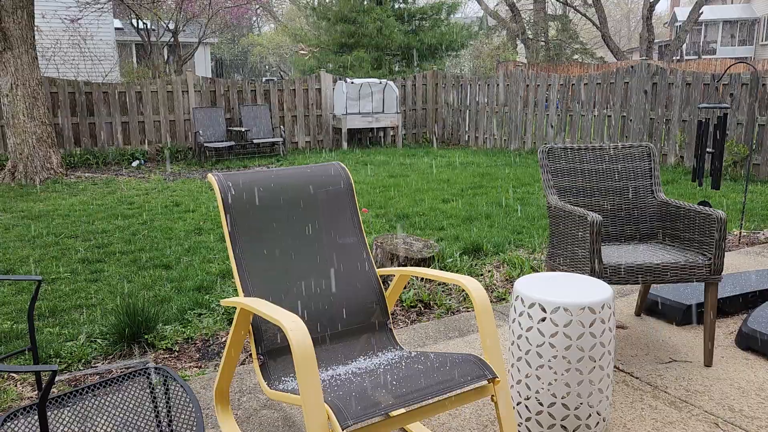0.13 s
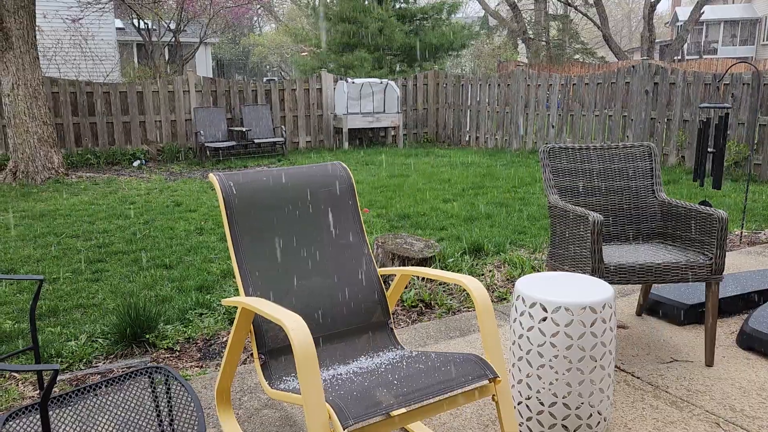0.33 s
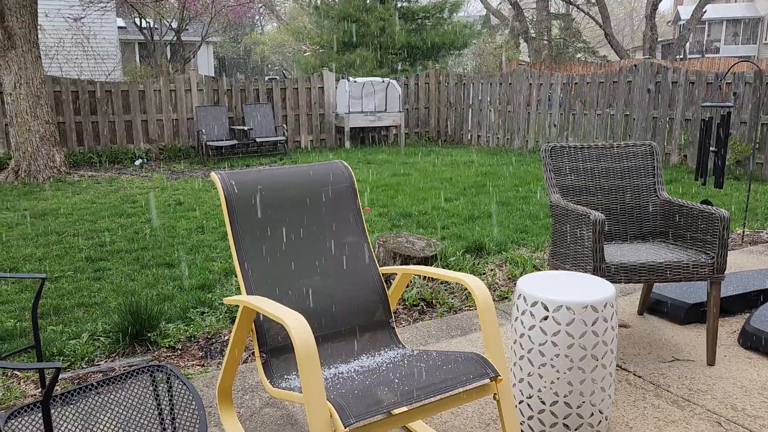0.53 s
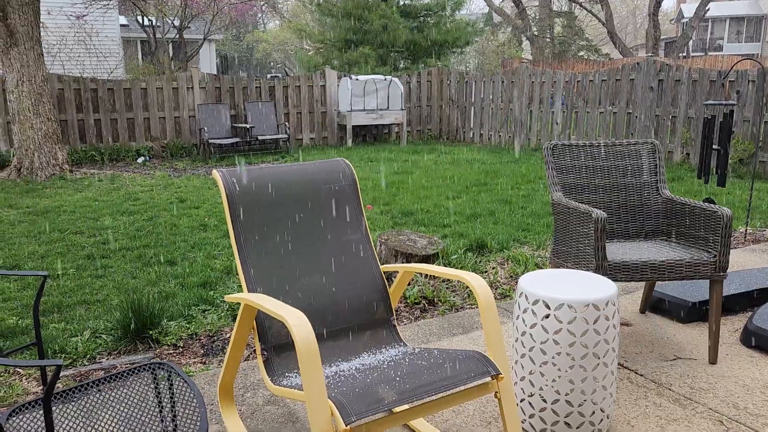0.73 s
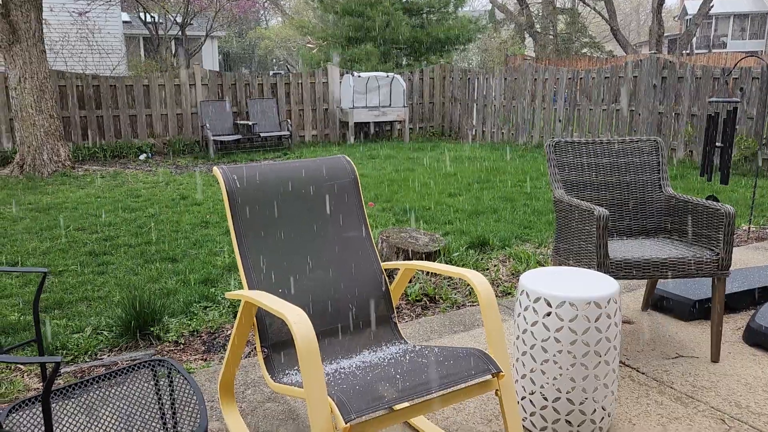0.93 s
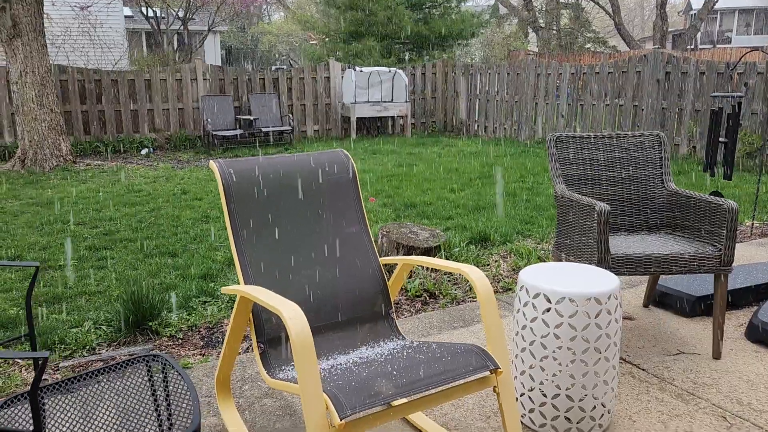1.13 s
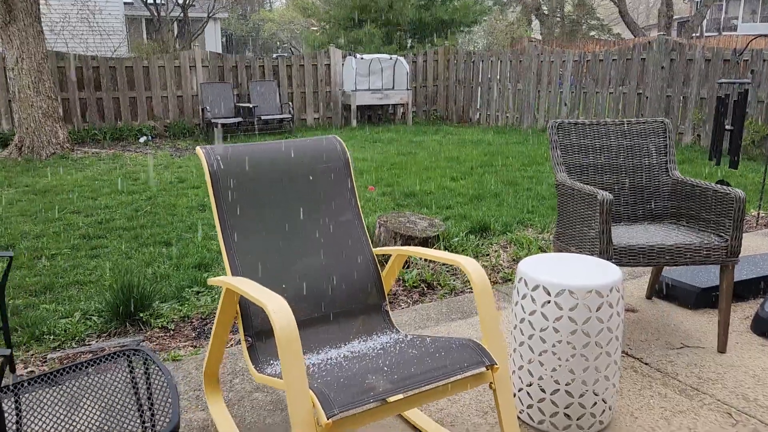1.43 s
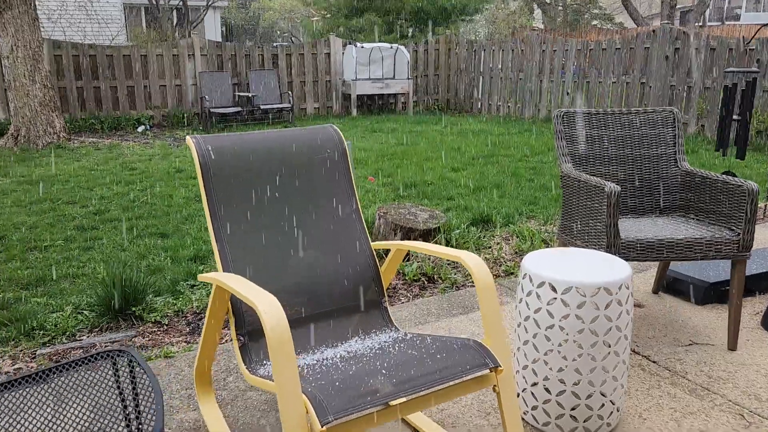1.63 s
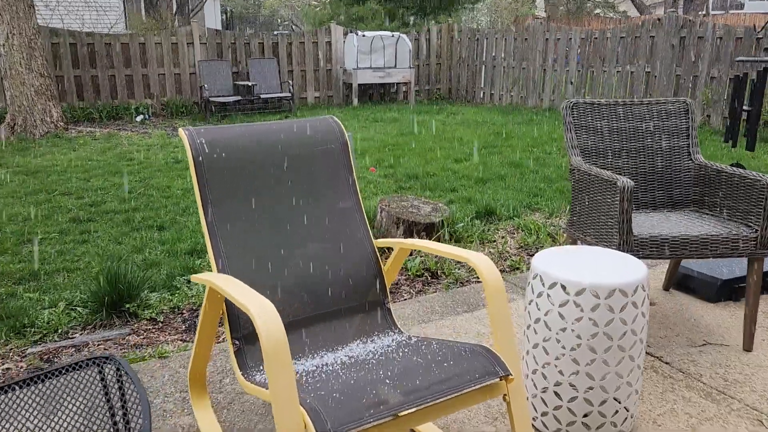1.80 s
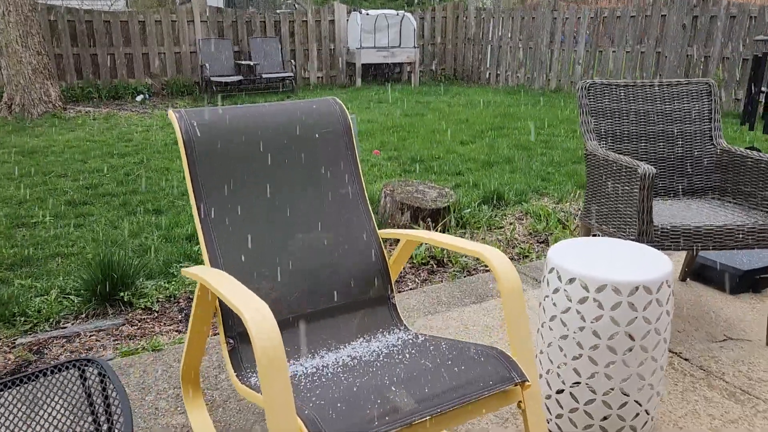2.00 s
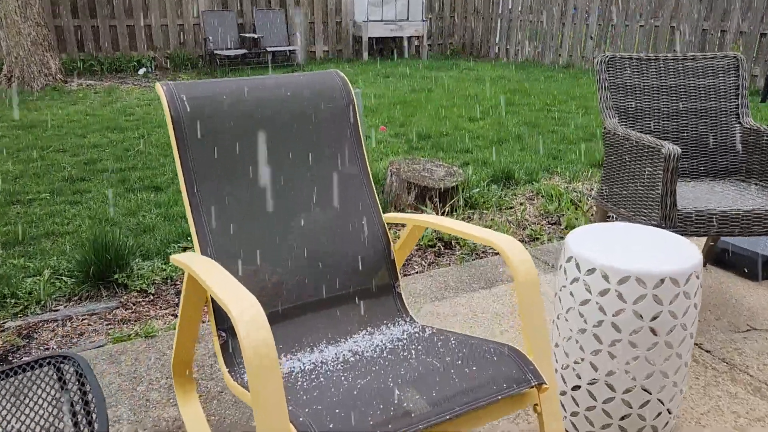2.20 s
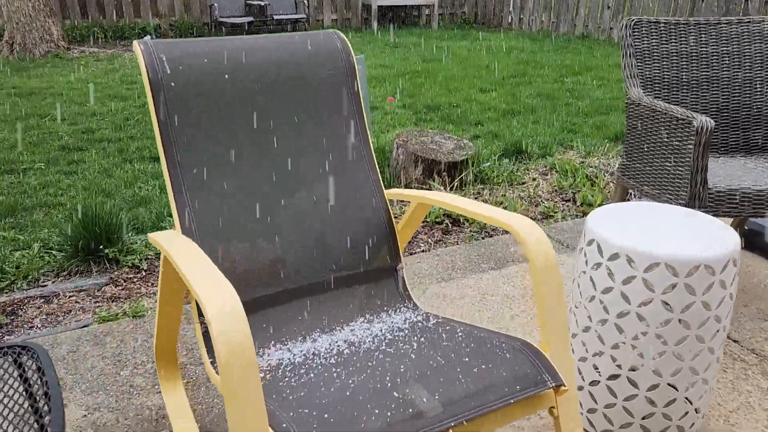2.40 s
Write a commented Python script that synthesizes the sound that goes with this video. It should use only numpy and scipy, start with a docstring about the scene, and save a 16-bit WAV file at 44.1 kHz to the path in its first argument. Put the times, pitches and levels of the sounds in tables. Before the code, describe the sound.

Ice pellets fall steadily on a patio and lawn: an even wide hiss with dense tiny ticks, over faint air rumble and distant machine hum. From 0.24 s, irregular sharp taps strike the camera, strong near 0.48, 1.34 and 1.4 s. A wind chime rings faintly at 1.36 s. Handling creaks cluster at 1.7-1.9 s and 2.43-2.53 s, with a low air puff near 2.4 s.

```python
"""Graupel on a backyard patio, heard from a hand-held camera; sound opens at 0.07 s.
Throughout: far pellets hiss (shaped noise), nearer ones tick (random hits), air rumbles, a distant machine hums.
From 0.24 s pellets strike the camera or close beside it: a shared thud plus a crack at each microphone.
At 1.36 s a wind chime rings once, faintly: one decaying sine.
From 1.68 s the case creaks in the hand (ringing slips, rubbing grains); near 2.4 s the air puffs."""
import sys
import numpy as np
from scipy import signal
from scipy.fft import rfft, irfft
from scipy.io import wavfile
from scipy.ndimage import uniform_filter1d

SR = 44100
rng = np.random.default_rng(int(sys.argv[2]) if len(sys.argv) > 2 else 0)


def unload_audio(sound):
    """Save the sound as a 16-bit wav file, at the path given as the first command line argument."""
    columns = np.transpose(np.atleast_2d(sound))
    # keep every value between -1 and 1, then stretch to whole-number steps
    steps = np.round(np.clip(columns, -1, 1) * 32767)
    wavfile.write(sys.argv[1], SR, steps.astype(np.int16))


N = 112455  # samples


def amp(db):
    """Decibels to gain."""
    return 10 ** (np.asarray(db) / 20)


def unit(x):
    """Scales to rms 1."""
    return x / np.sqrt(np.mean(x ** 2) + 1e-20)


def read(points, hz):
    """Interpolates a spectrum table on a log-frequency axis."""
    f, value = np.transpose(points)
    return np.interp(np.log(hz + 1), np.log(f + 1), value)


def add(mix, start_s, sound):
    """Mixes a stereo sound in at a time."""
    part = mix[:, max(round(start_s * SR), 0):][:, :sound.shape[1]]
    part += sound[:, :part.shape[1]]


def tint(x, colour):
    """Gives a long sound a spectrum; rms 1."""
    gain = amp(read(colour, np.fft.rfftfreq(N, 1 / SR)))
    return unit(irfft(rfft(x) * gain, N))


def causal(db):
    """Minimum-phase response with these gains: it rings only after the blow."""
    log_gain = np.log(amp(np.r_[db, db[-2:0:-1]]))
    return np.exp(np.conj(signal.hilbert(log_gain)))[:len(db)]


def flat(z, order):
    """Evens out the broad humps of a spectrum, smoothed over `order` bins."""
    power = uniform_filter1d(abs(z) ** 2, order)
    return z * causal(-10 * np.log10(power + 1e-9))


def burst(decay_s, scatter, size=1024, order=41):
    """Spectrum of a sharp contact (unit impulse) and its brief noisy rattle."""
    t = np.arange(size) / SR
    rattle = rng.standard_normal(size) * t * np.exp(-t / decay_s)
    contact = t == 0
    return flat(rfft(scatter * rattle / np.linalg.norm(rattle) + contact), order)


def spot(hz, level_db, bass_db, treble_db, ring_hz, ring_db, octaves, treble_hz, bass_hz=1650):
    """Colour in dB of one spot on the case: two shelves and a damped ring."""
    bass = bass_db / (1 + (hz / bass_hz) ** 8)
    treble = treble_db / (1 + (treble_hz / (hz + 1)) ** 8)
    ring = ring_db / (1 + (np.log2((hz + 1) / ring_hz) / octaves) ** 2)
    return level_db + bass + treble + ring


def strikes(thud_hz=1800, size=1024):
    """Pellets hit the camera: a thud of the whole case, and a brief crack that differs at each microphone."""
    # (time [s], level [dB], bass [dB], treble [dB], ring [Hz], ring [dB], left re right [dB])
    strike_list = [(0.236, -12, -4, -12, 4500, 2, -2), (0.3789, -7.5, 5.5, 3, 5600, 3, -5),
                   (0.408, -23, -8, 4.5, 6700, 14.5, 2), (0.477, 4.5, -0.5, -5, 3580, 13.5, -2.5),
                   (0.5759, 0.5, 2, -8, 3430, 4, -9), (0.6946, -12, 2.5, -1, 3400, 5.5, -5),
                   (0.9209, -8.5, -17, -15, 2500, 11, 1), (0.9573, -17, -6, 1, 14000, 0, 0),
                   (1.123, -16, -11, -8, 6000, 11, -2), (1.2522, -10, -8, -15, 2300, -2, 0),
                   (1.2676, -18.5, 1, -2, 13000, 9, 1), (1.3381, 0.5, -3, -7.5, 4550, 8.5, 3.5),
                   (1.396, 9, -7.5, -6, 3140, 8.5, -1.5), (1.5299, -11, -1.5, -3, 4470, 7.5, -3),
                   (1.5971, -3, -8, 0.5, 2780, 12, -3), (1.7361, -7, 1, -9, 3580, 8, 3),
                   (1.9423, -11, 3, -14, 3400, 5, -13), (1.9941, 1.5, -5.5, -14, 2460, 7, -5.5),
                   (2.434, -11, -6, 1, 5360, 8, -2), (2.4583, -4.5, -7, -8, 3200, 6, 2),
                   (2.5277, -8.5, 0, -7, 3400, 3, -5)]
    # colour at each microphone: (frequency [Hz], gain [dB])
    left_colour = [(100, -20.5), (250, -1), (500, -10.5), (1200, -6), (2400, 2), (3300, -9.5),
                   (4500, -24.5), (7000, 6.5), (9500, 1), (15000, 0)]
    right_colour = [(100, -18.5), (250, -6.5), (500, -8), (1500, 0.5), (2400, -2), (3400, 2), (5200, 2),
                    (7000, 3.5), (9500, -2.5), (11500, 6.5), (15000, -14)]
    decay_s, scatter, ring_octaves = 0.00032, 4.1, 0.28
    out, hz = np.zeros((2, N)), np.fft.rfftfreq(size, 1 / SR)
    thud_share = 1 / (1 + (hz / thud_hz) ** 6)  # of power
    thud = causal(10 * np.log10(thud_share + 1e-5))
    for time_s, *colour, pan_db in strike_list:
        pan = np.sqrt(2) * amp([[pan_db], [0]]) / np.hypot(amp(pan_db), 1)  # constant power
        spot_db = spot(hz, *colour, ring_octaves, treble_hz=5560)
        tick = []
        for microphone in (left_colour, right_colour):
            crack = np.sqrt(1 - thud_share) * burst(decay_s, scatter)
            blow = flat(thud + crack, order=13)
            tick.append(irfft(blow * causal(spot_db + read(microphone, hz))))
        add(out, time_s, pan * np.array(tick))
    return out


def patter(count=32, size=512, focus_db_per_octave=9, width_db=4):
    """Nearer pellets tick on many small spots, each with its own pitch and direction."""
    # colour: (frequency [Hz], relative level [dB])
    patter_colour = [(300, -18), (1200, -4), (2400, 1), (3200, 6), (6000, -8), (8500, 3), (10000, -6),
                     (11800, 0.5), (15500, -7)]
    hits_per_s, level_db, mean_spread_db, decay_s = 600, -50.5, 2, 0.00043
    out, hz = np.zeros((2, N)), np.fft.rfftfreq(size * 2, 1 / SR)
    for centre_hz in np.geomspace(1800, 14000, count):
        struck = rng.random(N) < hits_per_s / count / SR
        hits = struck * amp(mean_spread_db * np.minimum(rng.exponential(1, N), 5))
        octaves_off = abs(np.log2((hz + 1) / centre_hz)).clip(0, 3)
        tick = irfft(burst(decay_s, 1.2) * causal(-focus_db_per_octave * octaves_off))
        sound = signal.oaconvolve(hits, tick)[:N]
        side = rng.uniform(-1, 1)  # +1 left, -1 right
        right = np.roll(sound, round(side * 20))  # up to 20 samples between the ears
        out += [amp(side * width_db) * sound, amp(-side * width_db) * right]
    return amp(level_db) * tint(out, patter_colour)


def hiss(level_db=-40.5, patchy_db=1.0, flicker_db=1.0, size=512):
    """Far pellets merge into a wash of noise that drifts a little in patches and flickers as a whole."""
    # (frequency [Hz], relative density [dB])
    hiss_colour = [(120, -13), (200, -10.5), (300, -2), (420, -10), (700, -10), (1200, -7.5), (1500, -13),
                   (1900, -7), (2350, -2), (3100, -8), (4000, -6), (5200, -5), (6800, -5.5), (8500, -8),
                   (9900, -14.5), (10800, -11), (11600, -8), (13500, -12.5), (15800, -12)]
    # left-right likeness: (frequency [Hz], correlation [-1..1])
    likeness = [(200, 1), (500, 0.74), (1000, 0), (2300, 0), (4000, 0), (15000, 0)]
    # (frequency [Hz], left re right [dB])
    balance = [(60, 0.5), (120, -0.67), (240, -1.5), (480, -2.0), (950, -1.0), (1890, -0.12), (3770, -3.3),
               (7520, 2.3), (15000, 1.5)]
    hop = size // 4
    frames, hz = N // hop + 5, np.fft.rfftfreq(size, 1 / SR)
    a, b, c, d, patches = rng.standard_normal((frames, len(hz), 5)).T
    patches = uniform_filter1d(patches, size=10, axis=0)  # across frequency
    patches = unit(uniform_filter1d(patches, size=16, axis=1))  # across time
    flicker = unit(uniform_filter1d(rng.standard_normal(frames), size=4))
    same = np.clip(read(likeness, hz), -1, 1)[:, None]
    left = a + 1j * b
    right = same * left + np.sqrt(1 - same ** 2) * (c + 1j * d)
    z = np.array([left, right]) / np.sqrt(1 + same / 2 + 1e-9)
    pan_db = np.array([.5, -.5])[:, None, None] * read(balance, hz)[:, None]
    z *= amp(read(hiss_colour, hz)[:, None] + pan_db + patchy_db * patches + flicker_db * flicker)
    wash = signal.istft(z, nperseg=size, noverlap=size - hop)[1][:, :N]
    return amp(level_db) * unit(wash)


def creaks(apart=0.49, left_db=1, size=1024):
    """The grip shifts: dull slips of the case ring briefly, with fine rubbing grains around them."""
    # slips: (time [s], level [dB], bass [dB], treble [dB], ring [Hz], ring [dB])
    slip_list = [(1.6793, -8.5, 4, 2, 640, 10), (1.6865, -17, 3.5, 1, 1200, 10),
                 (1.6925, -12.5, 3.5, 1, 1260, 8.5), (1.7386, -4, -1, -3, 650, 3),
                 (1.7541, -6, 2.5, -6, 1210, 10), (1.763, -8, -1, -7, 2210, 3),
                 (1.7741, -0.5, 0, -13, 2350, 2), (1.7866, -8, -1, -9, 1210, 12),
                 (1.7981, 1.5, -2.5, -8, 1940, 1.5), (1.8189, -0.5, -1.5, -4, 1230, 8.5),
                 (1.8342, -4, -3, -4, 2250, -1), (1.8555, 1, 3.5, -2, 2200, 0.5),
                 (1.865, -12, 7.5, 5, 1200, 3), (1.8729, -10, -3, 2, 1200, 15),
                 (1.9202, -8, 0.5, -10, 1400, 15), (2.2765, -7, -1, 0, 2200, 4.5),
                 (2.4352, -9.5, 0, -18, 1090, 16), (2.4484, -9, 5.5, 6, 1090, 8),
                 (2.478, -7.5, 4, 8, 750, 4), (2.4876, 0.5, -10, 0, 2600, 6),
                 (2.5003, 7, -4, -2.5, 2180, 11.5), (2.516, -7, -15, 4, 2300, 7),
                 (2.534, -11, -4, 11, 1100, 2)]
    # (frequency [Hz], gain [dB])
    creak_colour = [(100, -35), (250, -26), (450, -4.5), (650, -2), (850, -3.5), (1200, -1.5), (1700, -12),
                    (2250, 3.5), (2900, -11), (3500, -7.5), (5000, -15), (8000, -17.5), (14000, -29)]
    # hand rubbing: (start [s], length [s], level [dB])
    rub_list = [(1.683, .04, -51), (1.748, .09, -45.5), (1.84, .04, -53), (2.43, .03, -47),
                (2.485, .065, -44)]
    decay_s, scatter, ring_octaves, grains_per_s = .00045, .7, 0.2, 2000
    out, hz = np.zeros((2, N)), np.fft.rfftfreq(size, 1 / SR)
    for time_s, *colour in slip_list:
        middle = burst(decay_s, scatter, order=15)
        slip = middle + apart * np.array([[1], [-1]]) * burst(decay_s, 16)  # opposite at the two sides
        colour_db = spot(hz, *colour, ring_octaves, treble_hz=3470) + read(creak_colour, hz)
        add(out, time_s, irfft(slip * causal(colour_db)))
    grains = rng.standard_normal((3, N)) * (rng.random(N) < grains_per_s / SR)
    t = np.arange(N) / SR
    pressure = np.zeros(N)
    for start_s, length_s, level_db in rub_list:
        progress = np.clip((t - start_s) / length_s, 0, 1)
        pressure += amp(level_db) * np.sqrt(abs(np.sin(np.pi * progress)))
    rubbing = pressure * tint(grains[0] + apart * grains[1:], creak_colour)
    return amp([[left_db], [0]]) * out + rubbing


def chime(start_s=1.362, tone_hz=1492, level_db=-44.5, t60_s=0.72, rise_s=0.03):
    """A metal chime tube rings faintly: one sine, exponential decay."""
    t = np.maximum(np.arange(N) / SR - start_s, 0)
    envelope = np.minimum(t / rise_s, 1) * np.exp(-np.log(1000) * t / t60_s)
    return amp(level_db) * envelope * np.sin(2 * np.pi * tone_hz * t)


def air(apart=.38, left_re_right_db=2.5):
    """Low rumble of air at the microphones, shaped noise with a late puff."""
    # (frequency [Hz], relative level [dB])
    air_colour = [(15, -29), (35, -3.5), (70, -4), (130, -3), (165, -11.5), (250, -30), (500, -49),
                  (2000, -70)]
    # (time [s], level [dB])
    air_level = [(0.1, -52.5), (1.2, -53.5), (1.75, -49), (2.0, -50.5), (2.27, -50.5), (2.38, -36.5),
                 (2.47, -56), (2.53, -42.5)]
    noise = rng.standard_normal((3, N))
    level_db = np.interp(np.arange(N) / SR, *np.transpose(air_level))
    rumble = tint(noise[0] + apart * noise[1:], air_colour)  # shared part plus one per side
    return amp(level_db) * rumble * amp([[left_re_right_db / 2], [-left_re_right_db / 2]])


def hum(waver_hz=3.44):
    """A distant machine: low tones, each wavering in pitch (rms waver_hz)."""
    # (frequency [Hz], rms level [dB])
    hum_tones = [(98, -59), (192, -65), (297, -67)]
    out = np.zeros(N)
    for tone_hz, level_db in hum_tones:
        drift = unit(uniform_filter1d(rng.standard_normal(N), size=3000, mode="wrap"))
        phase = 2 * np.pi * np.cumsum(tone_hz + waver_hz * drift) / SR
        out += amp(level_db) * unit(np.sin(phase))
    return out


def scene():
    """The whole shower."""
    return strikes() + patter() + hiss() + creaks() + chime() + air() + hum()


def record(dry, start_s=.068, rise_s=0.0045, edge_hz=15780):
    """The microphones open after a moment; then a steep low-pass limits the band."""
    opened = np.clip((np.arange(N) / SR - start_s) / rise_s, 0, 1)
    low_pass = signal.firwin(511, edge_hz, window=("kaiser", 9), fs=SR)
    return signal.oaconvolve(dry * opened, low_pass[None], "same")


dry = scene()
out = record(dry)
unload_audio(out)
```